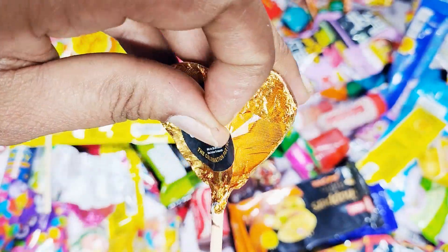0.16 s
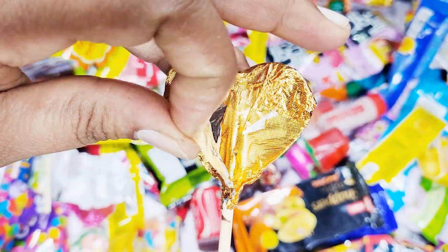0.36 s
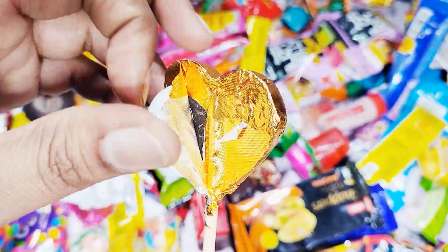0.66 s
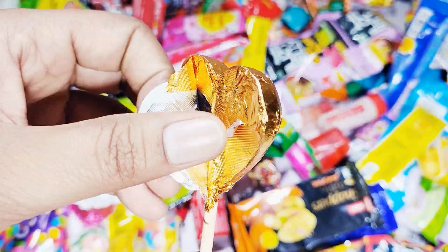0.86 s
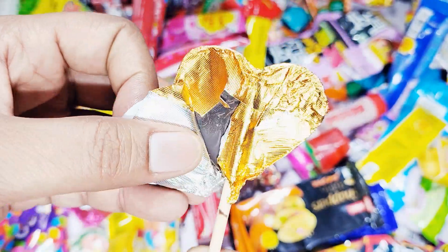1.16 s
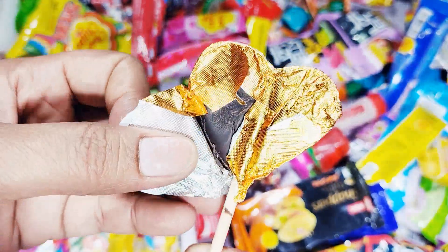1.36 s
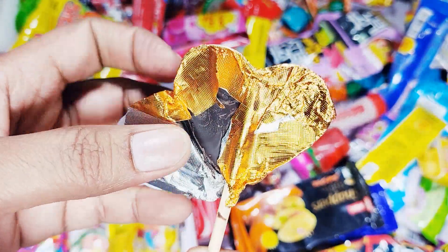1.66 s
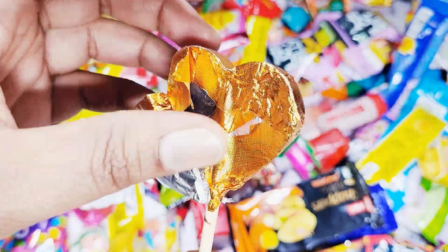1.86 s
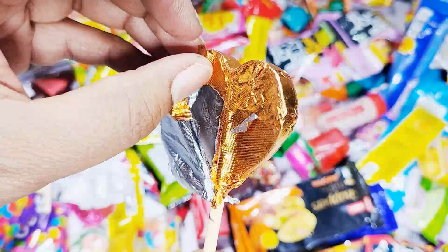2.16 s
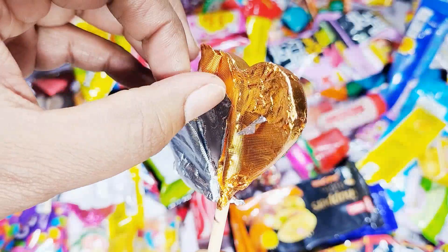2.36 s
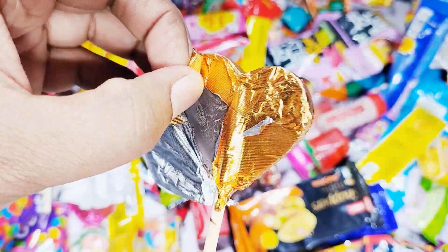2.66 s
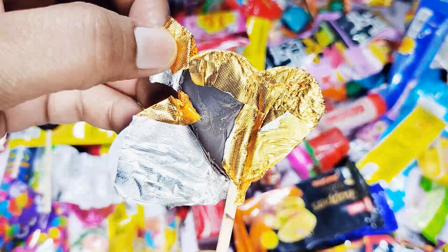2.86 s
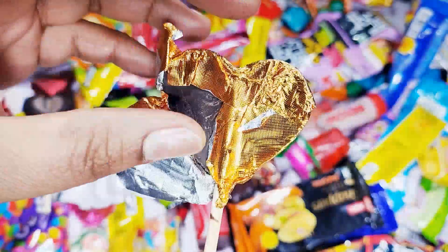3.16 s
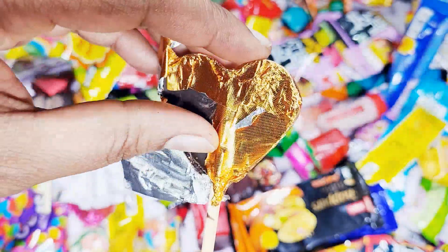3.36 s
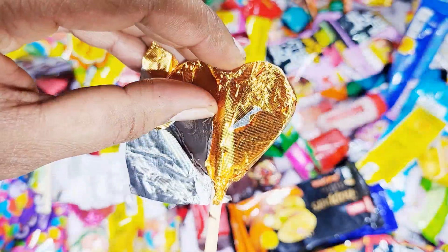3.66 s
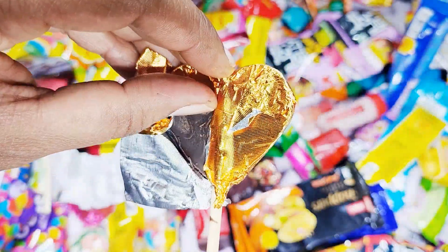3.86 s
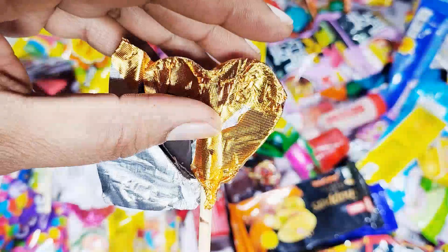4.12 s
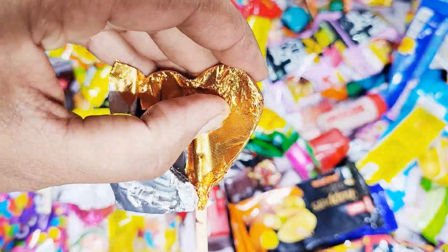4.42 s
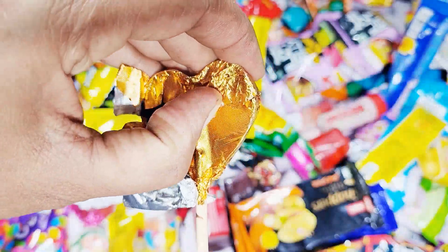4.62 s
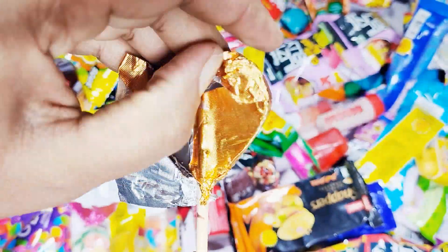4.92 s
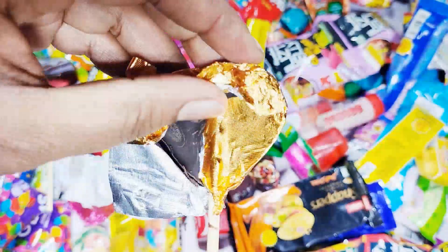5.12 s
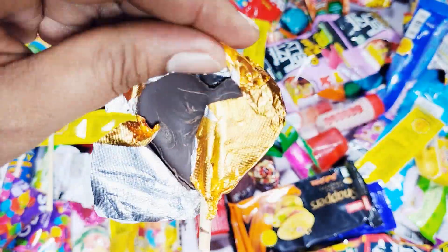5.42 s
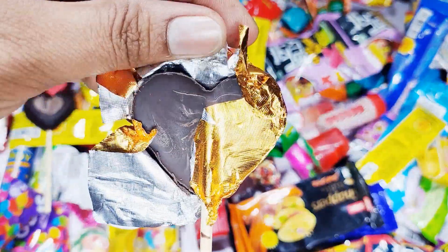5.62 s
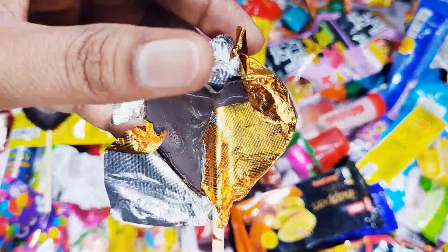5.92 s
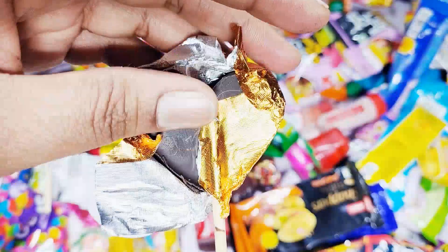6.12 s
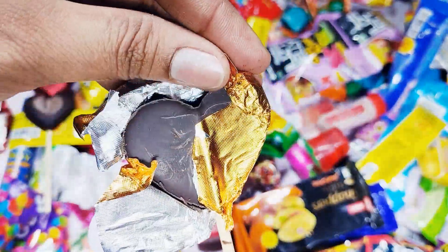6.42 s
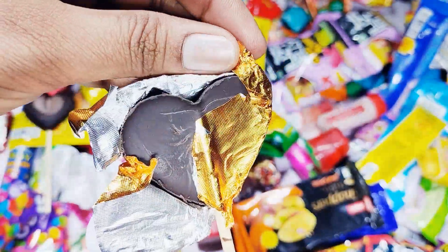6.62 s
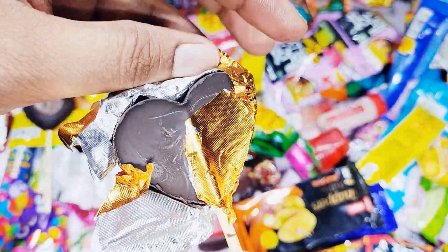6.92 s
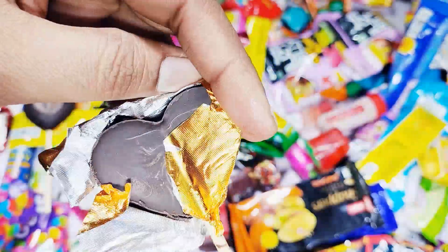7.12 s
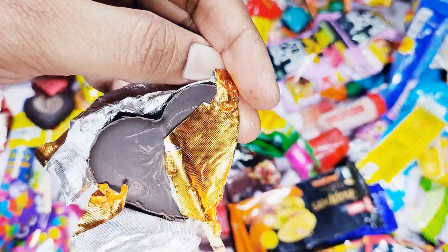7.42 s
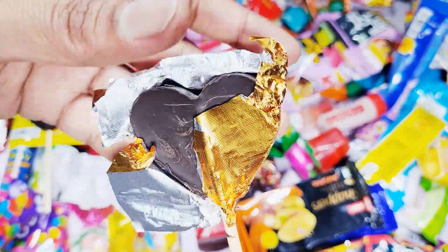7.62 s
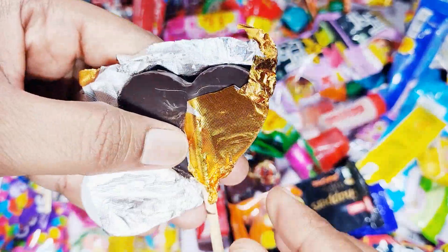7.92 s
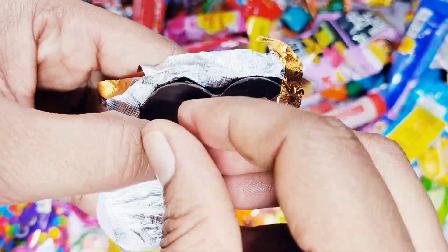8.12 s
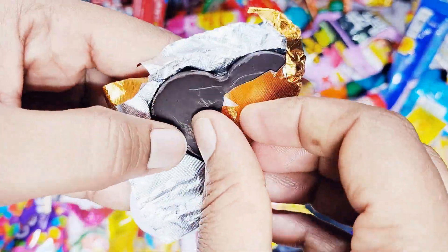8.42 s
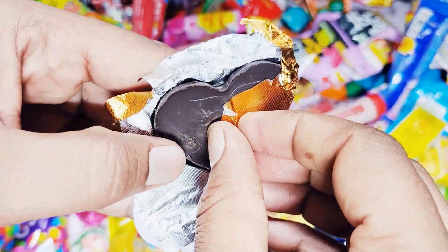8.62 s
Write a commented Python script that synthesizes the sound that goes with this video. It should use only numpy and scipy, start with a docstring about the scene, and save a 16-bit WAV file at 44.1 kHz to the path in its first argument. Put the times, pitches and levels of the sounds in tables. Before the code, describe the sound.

A small room with a low, steady fan hum, soft air noise and deep, muffled traffic outside. At first the foil is barely heard, with tiny ticks; from about 0.3 s fingers pull at it in short crackles, with a sharp snap at 1.0 s. Crisp rustles follow, stronger at 2.0-2.4 s and bursting into dense crackling and snaps at 2.7-2.9 s. From 3 to 4 s the crinkling is lighter. Distant engine rumble swells from about 3.9 to 6.5 s, while foil is sparse until a bright snap at 4.8 s. Peeling grows busier from 5 s, with a big snap at 5.85 s and fuller crackling at 6.1-6.4 s. Steady rustles lead to the strongest crunch and clustered snaps around 7.75 s, then softer crinkles fade towards 8.8 s. The foil is close, dry and bright, with a short, quiet room tail.

```python
"""A fan hums steadily and distant traffic rumbles outside a small room, before any foil is heard clearly.
Close to the stereo microphone, fingers then peel thin metal foil off a chocolate lollipop.
Fan and engines are tones over coloured noise; the rumble swells in the middle.
Each pull on the foil is a swarm of tiny noise clicks, and larger folds snap over as single bigger clicks.
The room adds a short, quiet tail to the foil."""
import sys
import numpy as np
from scipy import signal
from scipy.fft import rfft, irfft, next_fast_len
from scipy.io import wavfile
from scipy.ndimage import uniform_filter1d, map_coordinates

SR = 44100
rng = np.random.default_rng(int(sys.argv[2]) if len(sys.argv) > 2 else 0)


def wrap_up_sound(samples):
    """Save the sound to the file named by the first command line argument, as 16-bit audio."""
    columns = np.atleast_2d(samples).T
    # keep every value between -1 and 1, then stretch to whole-number steps
    tamed = np.clip(columns, -1, 1)
    steps = np.round(tamed * 32767).astype(np.int16)
    wavfile.write(sys.argv[1], SR, steps)


N = 387198  # length [samples]


def amp(db):
    """Decibels to gain."""
    return 10 ** (np.asarray(db) / 20)


def unit(x):
    """Scaled to rms 1 over all samples and both channels."""
    return x / np.sqrt(np.mean(x ** 2) + 1e-20)


def along(points, hz):
    """Read (frequency, value) points at hz, on a log frequency axis."""
    f, v = np.transpose(points)
    return np.interp(np.log(hz + 1), np.log(f + 1), v)


def wobble(rate):
    """A smooth random curve with rate knots a second."""
    knots = rng.standard_normal(int(N * rate / SR) + 4)
    return map_coordinates(knots, [np.arange(N) * rate / SR])


def filtered(x, response):
    """Multiply the spectrum of x by a response of frequency."""
    size = next_fast_len(N + SR // 4)
    hz = np.fft.rfftfreq(size, 1 / SR)
    return irfft(rfft(x, size) * response(hz), size)[..., :N]


def coloured(x, points):
    """Minimum-phase filter with the gain of (frequency [Hz], gain [dB]) points; attacks stay sharp."""
    size = 2048
    gain = amp(along(points, np.fft.rfftfreq(size, 1 / SR)))
    cepstrum = irfft(np.log(gain))
    # folding the cepstrum onto positive time makes the filter causal
    cepstrum[1:size // 2] *= 2
    cepstrum[size // 2 + 1:] = 0
    impulse = irfft(np.exp(rfft(cepstrum)))
    return signal.oaconvolve(x, impulse[None], axes=1)[:, :N]


def rush(spectrum, alike):
    """Stereo noise of rms 1: mid and side noises mixed for a given colour and left-right likeness."""
    def mid_and_side(hz):
        turn = np.arccos(np.clip(along(alike, hz), -1, 1)) / 2
        return amp(along(spectrum, hz)) * [np.cos(turn), np.sin(turn)]

    mid, side = filtered(rng.standard_normal((2, N)), mid_and_side)
    return unit(np.array([mid + side, mid - side]))


# fan tones in the room: (frequency [Hz], rms level about which the tone wavers [dB])
FAN_TONES = [(160, -66), (240.5, -72), (372, -78.5), (399.5, -70.5), (429, -75.5), (452.3, -67),
             (479, -72.5), (641, -77), (935, -80)]
# colour of the room's steady air: (frequency [Hz], relative density [dB per Hz])
AIR_COLOUR = [(30, -39), (45, 9), (110, -2.5), (200, -7), (300, -8.5), (430, -5.5), (530, -11),
              (750, -15.5), (930, -17.5), (1150, -26), (2400, -21.5), (3100, -33), (8000, -43.5),
              (15500, -38)]
# how alike the air is at the two microphones: (frequency [Hz], left-right correlation [0-1])
AIR_LIKENESS = [(100, 0.98), (250, 0.73), (450, 0.44), (1000, 0.053), (3000, 0.048), (10000, 0.068)]


def fan():
    """Slightly unsteady tones over a soft rush of air; the room shifts their phase between the microphones."""
    t = np.arange(N) / SR
    right_lead_s = np.array([[0], [0.0002]])
    left_right_db = [[1], [-1]]
    sound = amp(-56.0) * rush(AIR_COLOUR, AIR_LIKENESS)
    for hz, db in FAN_TONES:
        phase = 2 * np.pi * hz * (t + right_lead_s) + 0.28 * wobble(4)
        tone = unit(np.sin(phase))
        sound += amp(db + 2.5 * wobble(3.195)) * amp(left_right_db) * tone
    return sound


RUMBLE_DB = -1  # weight of the rumble under the engine notes
# distant traffic beyond the walls: (time [s], rumble level before RUMBLE_DB [dB])
TRAFFIC_LEVEL = [(0.0, -43), (0.05, -53.5), (0.32, -48.5), (2.4, -61), (3.64, -52.5), (4.01, -42),
                 (5.31, -45.5), (5.36, -48), (5.52, -43.5), (6.07, -46), (6.23, -43), (6.5, -47.5),
                 (6.73, -46), (6.8, -50.5), (7.16, -48.5), (8.78, -52.5)]
# colour of the far rumble: (frequency [Hz], relative density [dB per Hz])
RUMBLE_COLOUR = [(15, -19), (28, -29), (39, 1.5), (52, 0.5), (72, 3.5), (90, 0.5), (115, -0.5), (138, -8.5),
                 (162, -11), (200, -23.5), (300, -27.5), (600, -88)]
# engine notes that surge out of the rumble:
# (crest time [s], half length [s], pitch at crest [Hz], glide [Hz per s], rms level at crest [dB])
ENGINE_SURGES = [(0.405, 0.27, 99.3, 13, -48), (0.75, 0.084, 129, 0, -50.5), (3.9, 0.17, 109, 20, -48.5),
                 (4.089, 0.11, 66.2, 60, -42), (4.27, 0.14, 115.3, 45, -42), (4.43, 0.2, 116.2, -43, -46),
                 (4.519, 0.13, 71.3, -58, -42), (4.772, 0.16, 95, 10, -46), (5.031, .25, 69, -10, -48),
                 (5.238, 0.22, 96, -10, -46), (5.551, 0.22, 93.7, -12, -54),
                 (5.601, 0.12, 69.4, -45, -39.5), (5.848, 0.17, 63.8, 22, -43.5),
                 (6.249, 0.19, 72.3, 19, -40), (6.679, 0.19, 72, 13, -48.5), (7.349, 0.48, 70.7, 1, -53.5)]


def traffic():
    """Only the street's bass comes through the walls: noise rumble and gliding sines that swell and fade."""
    time = np.arange(N) / SR
    level_s, level_db = np.transpose(TRAFFIC_LEVEL)
    rumble_db = np.interp(time, level_s, level_db)
    sound = amp(rumble_db + RUMBLE_DB) * rush(RUMBLE_COLOUR, [(60, 0.94), (200, 0.99)])
    for crest, half, hz, glide, db in ENGINE_SURGES:
        t = time - crest
        near = np.abs(t) < 2 * half
        t = t[near]
        cycles = hz * t + glide * t ** 2 / 2 + rng.random()
        swell = np.exp(-2 * (t / half) ** 2)
        sound[:, near] += amp(db) * swell * unit(np.sin(2 * np.pi * cycles))
    return sound


def registers(x, low_hz=290, flex_hz=1550, fizz_hz=6400):
    """Split foil sound by the size of what moves: whole sheet, creases, finest wrinkles."""
    bands = [([low_hz, flex_hz], "bandpass"), ([flex_hz, fizz_hz], "bandpass"), (fizz_hz, "highpass")]
    split = []
    for hz, kind in bands:
        sos = signal.butter(3, hz, kind, fs=SR, output="sos")
        split.append(signal.sosfilt(sos, x))
    return split


def facet(spike, crack_t60, ring_db, ring_t60, apart):
    """Stereo click of one foil facet: a spike, a crack and a short noise ring of countless modes."""
    t = np.arange(SR // 32) / SR
    decay = amp(-60 * t / crack_t60) + amp(ring_db - 60 * t / ring_t60)
    shared, left, right = rng.standard_normal((3, len(t))) * decay
    shared[0] += spike
    lag = rng.integers(5, 9)  # samples; the right microphone hears it first
    left_ear = np.pad(shared + apart * left, (lag, 0))[:len(t)]
    pair = np.array([left_ear, shared + apart * right])
    return pair / np.sqrt(np.mean(np.sum(pair ** 2, axis=1)))


SNAP_DB, POP_DB, EDGE_DB = -15, 9.5, 24  # level of all snaps; weights of pop and edge against the crease
# ring of the crumpled sheet close to the microphone, with a hollow knock of the lollipop or hand near 330 Hz:
# (frequency [Hz], relative gain [dB])
FOIL_RING = [(250, -1.5), (330, 6), (480, -5.5), (920, 3.5), (1180, -4.5), (1500, -2.5), (1800, -0.5),
             (2450, 4.5), (3000, 0), (4300, 4), (7300, -10), (9400, -9), (11000, -7), (15800, -11)]
# folds snapping over close by: (time [s], level before SNAP_DB [dB], low pop before POP_DB [dB],
# bright edge before EDGE_DB [dB], left minus right [dB])
FOLD_SNAPS = [(0.1191, -46, -20, -10, -1.0), (0.228, -42, -14.5, -8, -9), (0.3242, -30, -24, -19, 2),
              (0.5601, -43.5, -14, -15, -6), (0.6759, -38.5, -26, -10, -2.5), (0.707, -31.5, -10.5, -6, -2),
              (0.9438, -32.5, -5.5, -11, -5), (1.0021, -18, -14.5, -13, -5.5),
              (1.1674, -39.5, -16, -6, -2.5), (1.3708, -35, -28, -12, -7), (1.4035, -29.5, -35, -9, -6),
              (1.5986, -34.5, -10, -17, -6), (1.9343, -39, -12, -11, 0.5), (1.966, -34, -18, -5, 0.0),
              (2.022, -34, -22, -9, 9), (2.0388, -28, -38, -6, 6), (2.0952, -34, -25, -2, 2),
              (2.3062, -41.5, -12, -25, 4), (2.3539, -28, -17, -21.5, -2), (2.3637, -40, -17, -7, -1.5),
              (2.4601, -36, -14, -11, -1.0), (2.7337, -38, -24, -24, -2), (2.7488, -32, -29, -20, -10),
              (2.7554, -27, -29, -19, 1), (2.7677, -25.5, -27, -16, -6), (2.7794, -25, -29, -9, -4),
              (2.815, -23.5, -24, -8.5, -6.0), (2.8764, -34, -26, -18, -3), (3.71, -42.5, -25, -18, 0),
              (3.9617, -38.5, -17, -15, 0), (4.1165, -30.5, -22, -18, -8), (4.1482, -27.5, -22, -19.5, -4),
              (4.6405, -42, -11, -5, -10), (4.659, -36.5, -11, -5, -2.5), (4.7292, -42.5, -27, -25, -2),
              (4.795, -41, -24, -7, -5), (4.807, -34.5, -27, -12.5, -5.0), (4.8272, -20, -40, -2, 0),
              (4.9596, -28, -14, -12, -3.5), (5.1173, -41, -19, -4, -4.5), (5.1486, -26, -34, -16.5, -0.5),
              (5.236, -21.5, -30, -15, -5.5), (5.342, -30.5, -34, -18, -2.5),
              (5.362, -26.5, -38, -13.5, -4), (5.4565, -39, -18, -20.5, -5), (5.485, -36, -15, -7, -2.5),
              (5.5096, -29.5, -22, -17, 0), (5.532, -23.5, -22, -20.5, 1.5), (5.6927, -28, -26, -12, -1),
              (5.8522, -13.5, -17.5, -6, -3.5), (6.112, -38, -21, -15, -13), (6.296, -28, -17, -15, -2.0),
              (6.3604, -29.5, -6, -16.5, 0), (6.694, -29.5, -17, -13.5, -1), (6.753, -37, -30, -19, -4),
              (7.1749, -21, -21, -10, -1), (7.3988, -28, -24, -18.5, -3.5), (7.4465, -32, -16, -7, 8),
              (7.5378, -32.5, 1, -17, -3), (7.574, -23, -23, -16.5, 4), (7.7413, -33, -14, -19, -1.0),
              (7.772, -18.5, -33, -10, 5), (7.7766, -17.5, -20.5, -17, 1), (7.79, -24.5, -14.5, -16, -3),
              (7.8637, -28.5, -32, -16.5, 2.5), (8.151, -36, -22, -13, -6), (8.367, -37, -18, -11, -1.5),
              (8.745, -43.5, -28, -19.5, -4.5)]


def snaps():
    """Larger folds flip over, each a click with a ring of its own, coloured by the sheet and a hollow knock
    near 330 Hz."""
    out = np.zeros((2, N + SR))
    for s, level_db, pop_db, edge_db, pan_db in FOLD_SNAPS:
        fold = facet(spike=2.0, crack_t60=0.0084, ring_db=8.5, ring_t60=0.02, apart=0.9)
        pop, crease, edge = [unit(x) for x in registers(fold)]
        click = unit(crease + amp(edge_db + EDGE_DB) * edge + amp(pop_db + POP_DB) * pop)
        pan = amp([[pan_db / 2], [-pan_db / 2]])
        start = round(s * SR)
        out[:, start:start + click.shape[1]] += amp(level_db + SNAP_DB) * pan * click
    return coloured(out[:, :N], FOIL_RING)


def creases(rate, spread_db, ring_db, count):
    """A swarm of tiny buckles of uneven size, rate a second, shared among count facets; rms 1."""
    swarm = np.zeros((2, N))
    for _ in range(count):
        happens = rng.random(N) < rate / count / SR
        sizes = amp(spread_db * np.clip(rng.standard_normal(N // 16), -2, 2))
        buckles = np.zeros((1, N))
        buckles[0, happens] = sizes[:happens.sum()]
        click = facet(spike=2.45, crack_t60=0.0019, ring_db=ring_db, ring_t60=0.038, apart=0.97)
        swarm += signal.oaconvolve(buckles, click, axes=1)[:, :N]
    return unit(swarm)


SLIPS_PER_S, SLIP_S, SLIP_DB = 45, 0.0046, 5.5  # rate, decay time, size of a slip over the steady pull


def slipping():
    """The foil sticks and slips: a gain of rms 1 jumps at each chance slip and dies back at once."""
    slips = (rng.random(N) < SLIPS_PER_S / SR) * rng.uniform(.5, 1, N)
    surge = signal.lfilter([1], [1, -np.exp(-1 / (SLIP_S * SR))], slips)
    return unit(1 + amp(SLIP_DB) * np.minimum(surge, 1))


def reshaped(x):
    """As the sheet changes shape, its resonances come and go within some hundredths of a second."""
    depth_db, bins, frames = 2.8, 3, 10
    z = signal.stft(x, nperseg=256)[2]
    field = uniform_filter1d(rng.standard_normal(z.shape[1:]), bins, axis=0)
    field = uniform_filter1d(field, frames, axis=1)
    depth = depth_db * np.linspace(1.1, .7, len(field))[:, None]  # shallower towards the treble
    gain = amp(depth * np.clip(unit(field), -2, 2))
    return signal.istft(z * gain, nperseg=256)[1][:, :N]


GRIP_DB, SLACK_DB = 11.5, 19  # a pull starts this far under its crest, has sunk this far after its fall
ARCH, GRIP_S = 1.18, 0.0042  # roundness of the crest; time for the foil to give [s]
# fingers resting on the foil, one level [dB] each: flexing sheet, creases, fizz
REST_LEVELS = [-73.5, -81, -86.5]
# pulls of the fingers, close to the microphone: (start time [s], rise [s], fall [s], crinkle level [dB],
# fizz re crinkle [dB], flexing sheet re crinkle [dB], loose flap pitch [Hz], flap lift [dB]);
# the three levels come before the register weights of crinkle()
FINGER_PULLS = [(0.318, 0.0096, .025, -64.5, 7, 13.5, 4560, 9),
                (0.401, 0.0093, 0.024, -83, -10, 22, 800, 15), (0.577, 0.022, 0.03, -60, 2.5, -2, 4260, 4),
                (0.668, 0.022, 0.031, -55, -10, -1, 6750, 4), (0.75, 0.049, 0.032, -58.5, -3, 1, 4480, 8),
                (0.86, 0.09, 0.037, -60.5, 4.5, 0, 4640, 8.5), (1.0, .005, .04, -66, 9, -13, 2500, -9),
                (1.106, 0.02, 0.027, -51.5, -2.5, -23, 6100, 10.5),
                (1.19, 0.018, 0.055, -70.5, -2, -1, 2270, 16.5),
                (1.298, 0.04, 0.18, -57, -5.5, -12, 2530, 6.5),
                (1.585, 0.018, 0.044, -64.5, -2, 9.5, 2680, 13.5),
                (1.65, 0.028, 0.053, -60.5, -8.5, 5, 2130, 12.5),
                (1.996, 0.02, 0.062, -50, 0.5, -20, 6850, 2),
                (2.095, 0.05, 0.057, -58.5, -1.5, -18, 1410, 12),
                (2.21, 0.044, 0.078, -52, -1.5, -2.5, 5530, 5.5),
                (2.342, 0.0096, 0.026, -45, -1, -3.5, 4940, 6),
                (2.454, 0.019, 0.055, -55.5, 2.5, -11, 2080, 1), (2.568, .05, 0.073, -61, 3, -16, 5350, 5),
                (2.726, 0.042, 0.074, -46, -5.5, -21, 2350, 8.5),
                (2.808, 0.065, 0.023, -43, -4.5, -19, 2500, 4),
                (2.934, 0.015, 0.059, -57, -5, -13, 1620, 11.5),
                (2.99, 0.02, 0.022, -62.5, -4, -6, 1620, 12.5),
                (3.25, 0.053, 0.047, -60, -4, -9, 2210, 5.5), (3.34, 0.069, 0.087, -60, -5, -9, 1910, 4),
                (3.47, 0.045, 0.049, -58, -2.5, -1, 2030, 10),
                (3.56, 0.087, 0.078, -59, -6, -23, 6030, 8.5), (3.78, 0.04, .025, -63.5, -1.5, -3, 2120, 4),
                (3.946, 0.023, 0.038, -59, 2.5, 7.5, 2450, 15),
                (4.109, 0.023, 0.03, -47.5, -11, -0.5, 1920, 9.5),
                (4.195, 0.017, 0.065, -69, 4.5, 7, 6000, 4.5), (4.36, 0.026, .1, -78.5, 7, 7, 1180, 5),
                (4.51, 0.02, 0.044, -73, -6, 12, 1490, 10.5), (4.635, 0.029, 0.079, -65.5, 2, -4, 3900, -1),
                (4.71, 0.013, 0.048, -64, -4, -2, 3900, 8), (4.789, 0.043, .035, -60, 5, 0, 3800, 17.5),
                (4.925, 0.06, 0.031, -54, 1, -2.5, 3900, 3.5),
                (5.101, 0.053, 0.089, -52, -5, -10, 6640, 7.5), (5.22, 0.0085, 0.12, -58.5, 0, -6, 6840, 8),
                (5.323, 0.087, 0.025, -48.5, -3.5, -10.5, 1370, 10),
                (5.46, 0.085, 0.034, -48, -8, -2.5, 5400, 2.5),
                (5.63, 0.073, 0.083, -53, -6.5, -8, 5360, 1.5),
                (5.805, 0.037, 0.035, -57, -1, 0.5, 5640, 5),
                (6.107, .03, 0.037, -42.5, -2, 1.5, 3580, 9.5), (6.18, 0.038, 0.13, -45, -3, -3, 6900, 4),
                (6.293, 0.067, 0.022, -43.5, -1, -6, 1360, 7.5),
                (6.411, 0.14, 0.044, -50.5, -1, -6, 3250, 9.5),
                (6.628, 0.081, 0.074, -54.5, -5.5, -7.5, 5936, 7.5),
                (6.749, 0.055, 0.045, -57, -4.5, -5, 5700, 7),
                (6.83, 0.019, 0.045, -59.5, -2.5, -5, 2270, 13.5),
                (6.903, 0.043, 0.066, -53, -2, -2.5, 4750, 4.5),
                (7.03, 0.099, 0.049, -54.5, -1.5, 0, 3270, 5.5),
                (7.166, 0.021, 0.066, -50.5, -0.5, -12, 1070, 8),
                (7.32, 0.073, 0.086, -63, -3.5, 1, 6150, -1.5),
                (7.393, 0.047, 0.042, -47.5, -4.5, -4, 4300, -1),
                (7.5, 0.086, 0.011, -44.5, -3.5, -9.5, 4790, 2),
                (7.736, 0.034, 0.054, -39.5, -3, -5.5, 2700, 3.5),
                (7.815, 0.01, 0.056, -49.5, -5, -7, 3320, 2), (8.03, 0.17, 0.04, -59, -1.5, 0, 2500, 8.5),
                (8.191, 0.12, 0.028, -51.5, -2.5, -4.5, 3100, 11),
                (8.37, 0.055, 0.15, -59, -5, -0.5, 1180, -5), (8.74, 0.04, .04, -65.5, -7, -9, 5100, 9)]


def effort():
    """Gain of flexing sheet, creases and fizz: each pull grips, swells to a crest and slackens."""
    power = np.ones((3, N)) * amp(REST_LEVELS)[:, None] ** 2
    for start, rise, fall, db, fizz_db, flex_db, *_ in FINGER_PULLS:
        first = max(round(start * SR), 0)
        t = np.arange(min(round((rise + 3 * fall) * SR), N - first)) / SR
        rising = t < rise
        from_crest = np.abs((t - rise) / np.where(rising, rise, fall))
        under_db = np.where(rising, GRIP_DB, SLACK_DB) * from_crest ** ARCH
        gain = amp(db - under_db) * np.minimum(t / GRIP_S, 1)
        power[:, first:first + len(t)] += (amp([[flex_db], [0], [fizz_db]]) * gain) ** 2
    return np.sqrt(power)


def crinkle():
    """Pulled foil buckles in a dense rustle with sparse crisp ticks; level and colour follow the fingers."""
    flex_gain, crease_gain, fizz_gain = effort()
    rustle = creases(rate=3000, spread_db=3.0, ring_db=-3, count=9)
    ticks = amp(-7) * creases(rate=120, spread_db=2.5, ring_db=-4, count=5)
    sheet = reshaped(coloured(rustle * slipping() + ticks, FOIL_RING))
    flex, crease, fizz = [unit(x) for x in registers(sheet)]
    # left and right weight of each register [dB]
    sound = flex_gain * flex * amp([[-5], [-.2]])
    sound += crease_gain * crease * amp([[-1.5], [1.9]])
    sound += fizz_gain * fizz * amp([[1.9], [3.1]])
    return sound


FLAP_Q = 6.5  # sharpness of a loose flap's resonance


def flapping(x):
    """Each pull frees a flap that lifts the crackle around its own pitch until the fingers press it down."""
    out = x.copy()
    for start, rise, fall, *_, hz, lift_db in FINGER_PULLS:
        span = slice(max(round(start * SR), 0), round((start + rise + fall) * SR))
        ring = signal.lfilter(*signal.iirpeak(hz, FLAP_Q, SR), x[:, span])
        fade = signal.windows.tukey(ring.shape[1], .3)
        out[:, span] += (amp(lift_db) - 1) * ring * fade
    return out


# decay of the small room: (frequency [Hz], time to fall by 60 dB [s])
ROOM_DECAY = [(300, 0.43), (2500, 0.16), (7000, 0.19), (15000, 0.14)]


def room(x):
    """The walls answer with a short diffuse noise tail that lasts longest in the low range."""
    hz, t, z = signal.stft(rng.standard_normal((2, SR // 3)), SR, nperseg=256)
    decay = amp(-60 * t / along(ROOM_DECAY, hz)[:, None])
    tail = signal.istft(z * decay, SR, nperseg=256)[1]
    tail *= 1 - np.exp(-np.arange(tail.shape[1]) / SR / 0.0023)  # the tail builds up softly
    return signal.oaconvolve(x, tail / np.linalg.norm(tail[0]), axes=1)[:, :N]


def scene():
    """Foil close to the microphone, the room's answer to it, fan and street behind."""
    foil = amp(1.5) * flapping(crinkle() + snaps())
    return foil + amp(-14.0) * room(foil) + fan() + traffic()


TOP_HZ = 15900  # the recorder's band limit


def record(dry):
    """The recorder keeps nothing above its band limit: a very steep low-pass."""
    return filtered(dry, lambda hz: 1 / np.sqrt(1 + (hz / TOP_HZ) ** 200))


dry = scene()
out = record(dry)
wrap_up_sound(out)
```